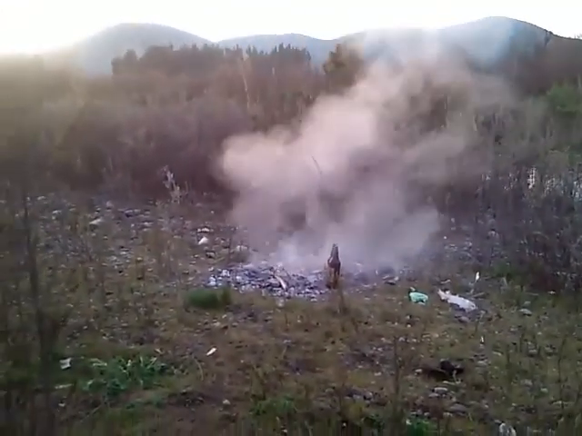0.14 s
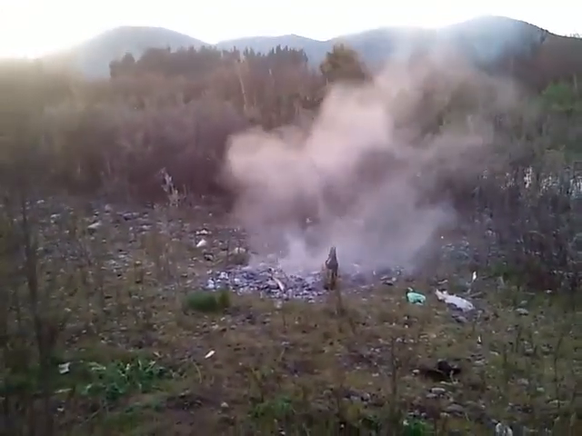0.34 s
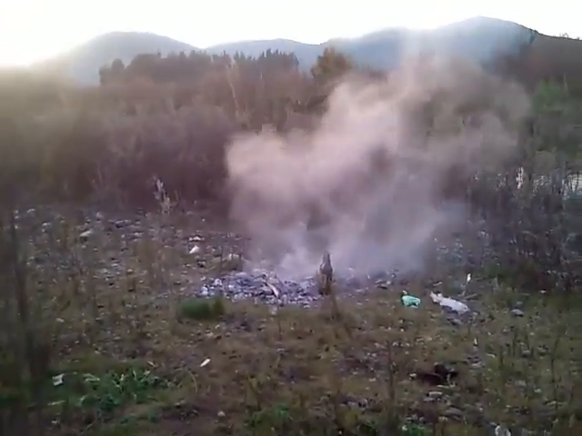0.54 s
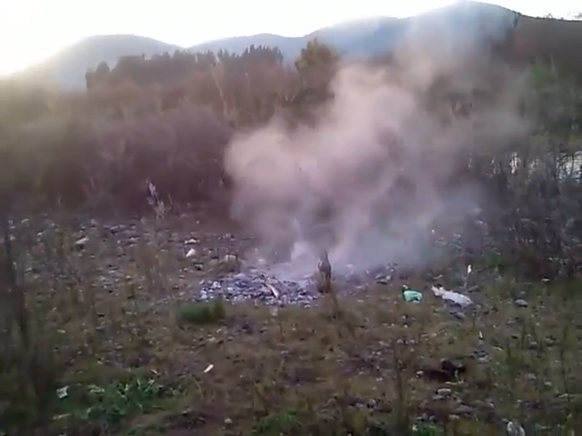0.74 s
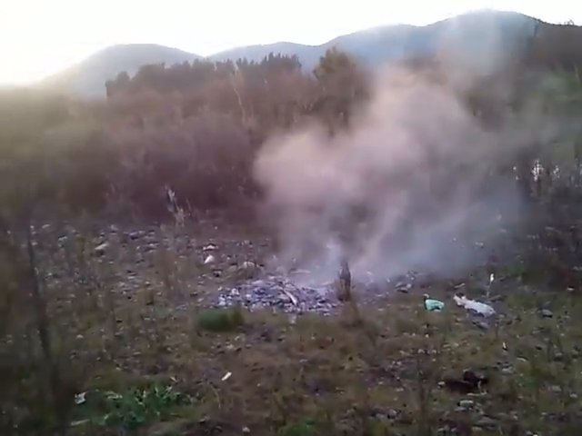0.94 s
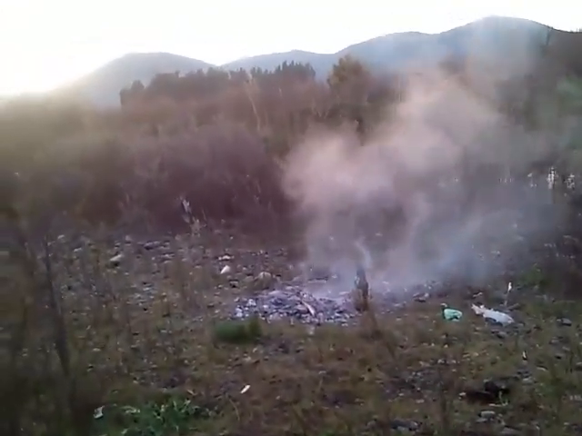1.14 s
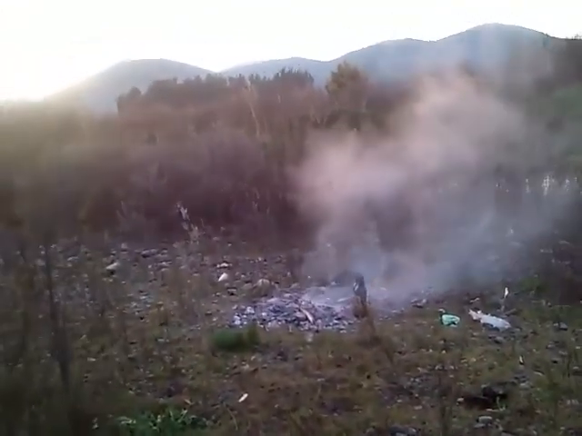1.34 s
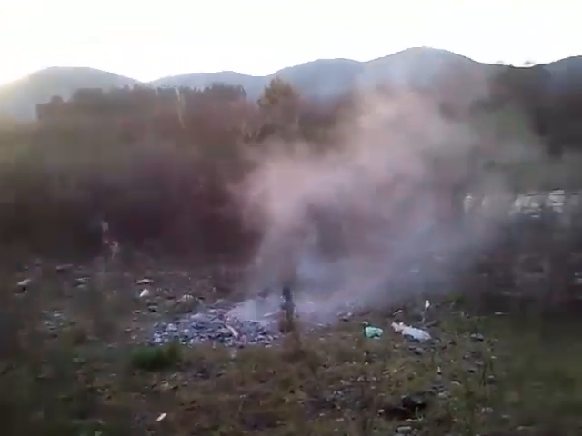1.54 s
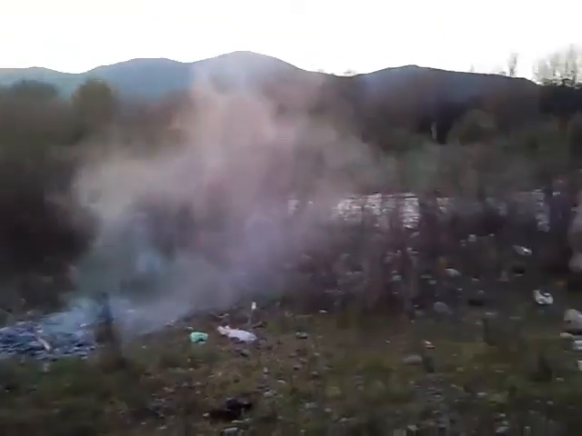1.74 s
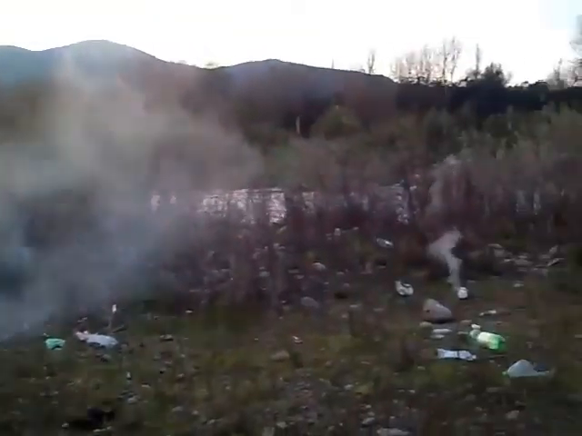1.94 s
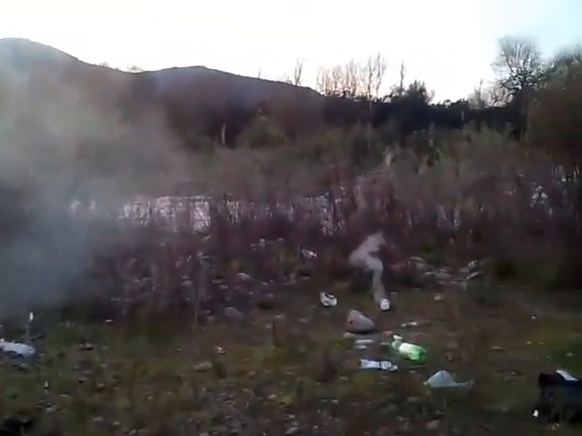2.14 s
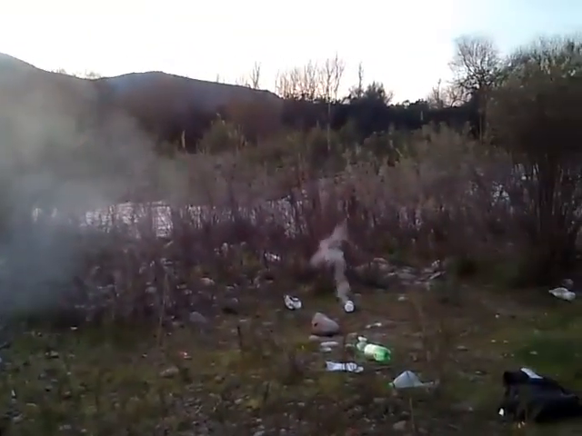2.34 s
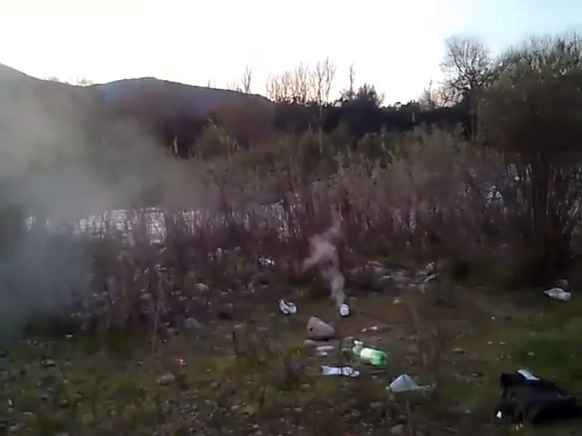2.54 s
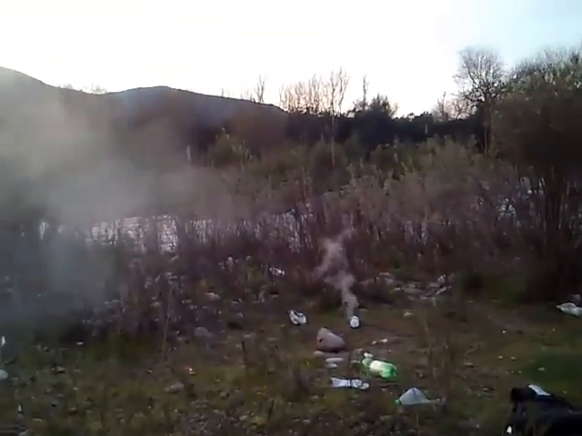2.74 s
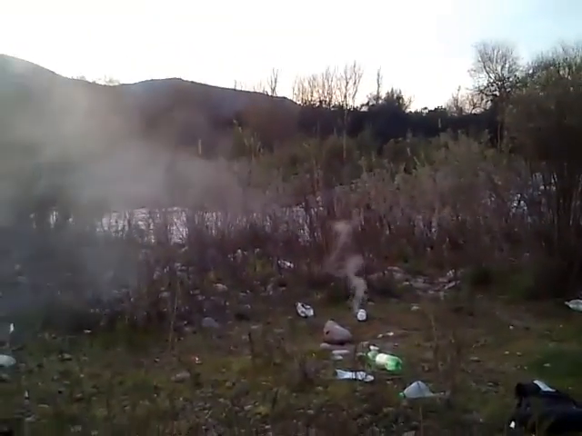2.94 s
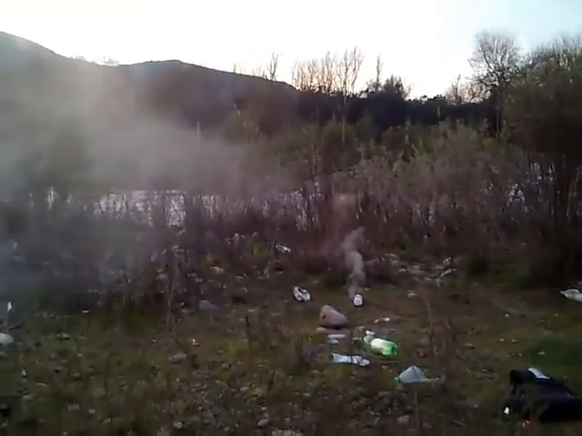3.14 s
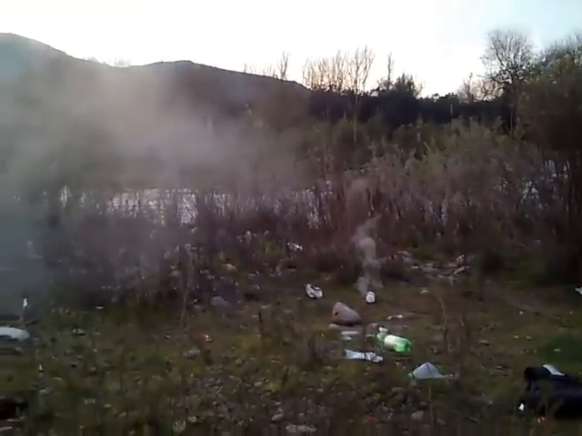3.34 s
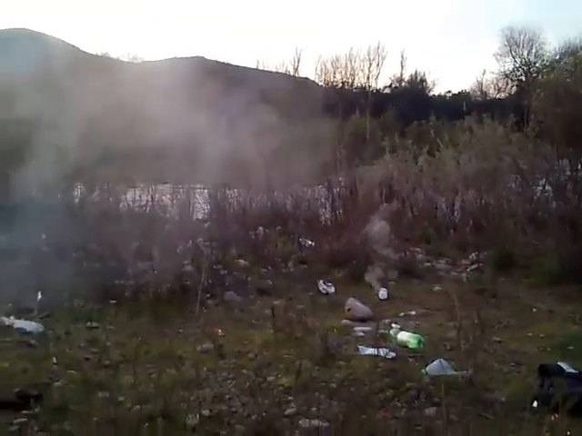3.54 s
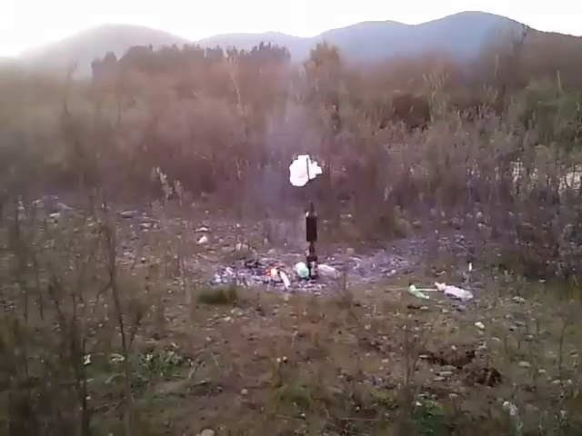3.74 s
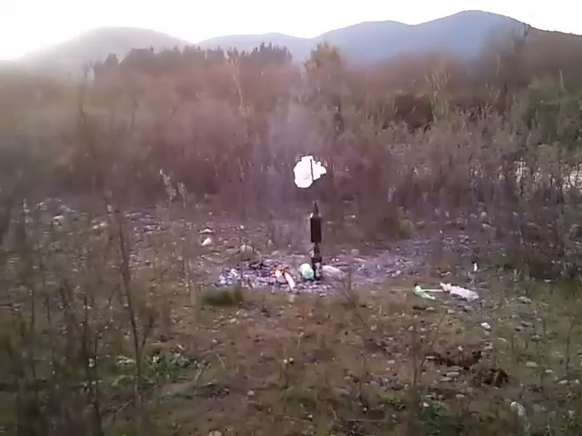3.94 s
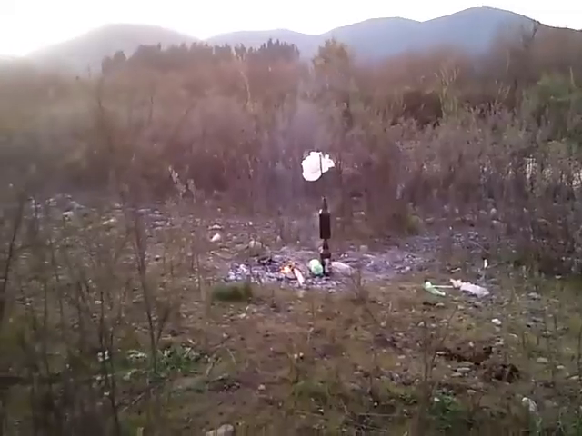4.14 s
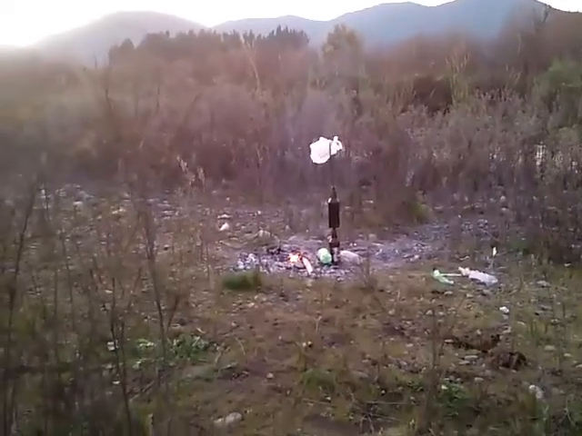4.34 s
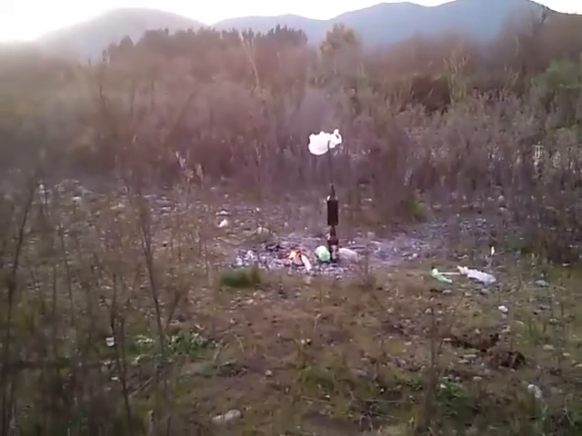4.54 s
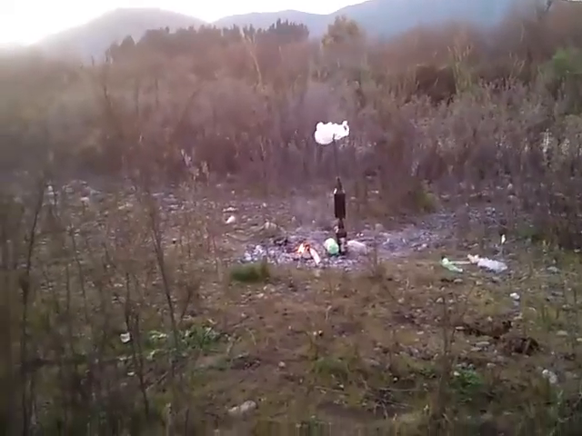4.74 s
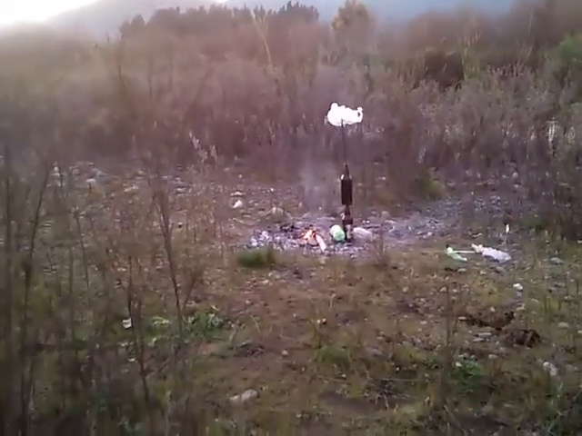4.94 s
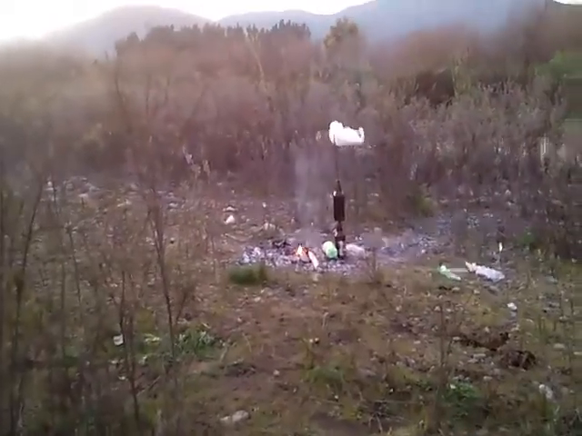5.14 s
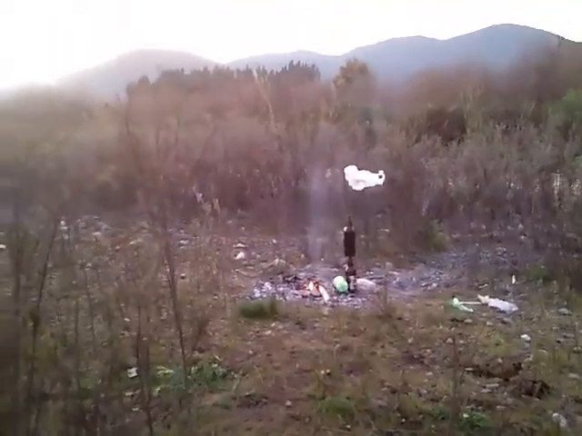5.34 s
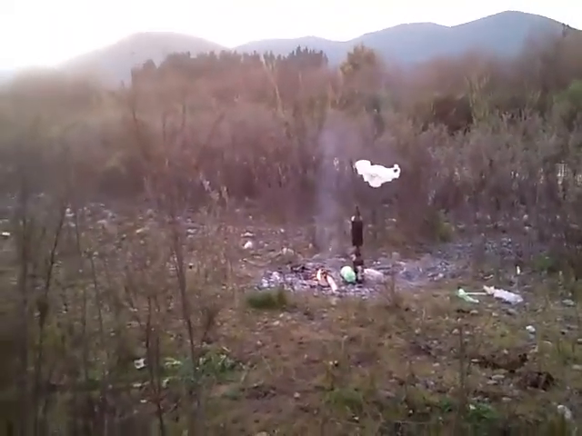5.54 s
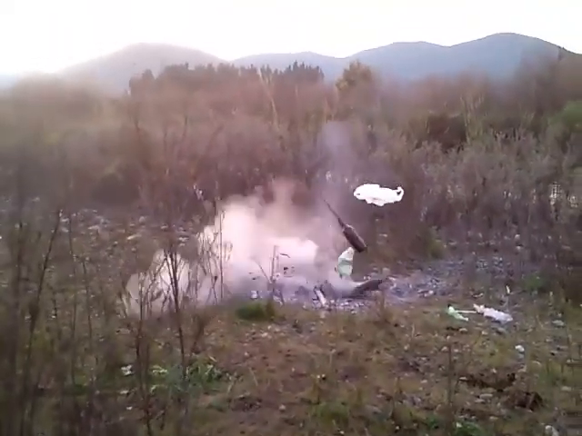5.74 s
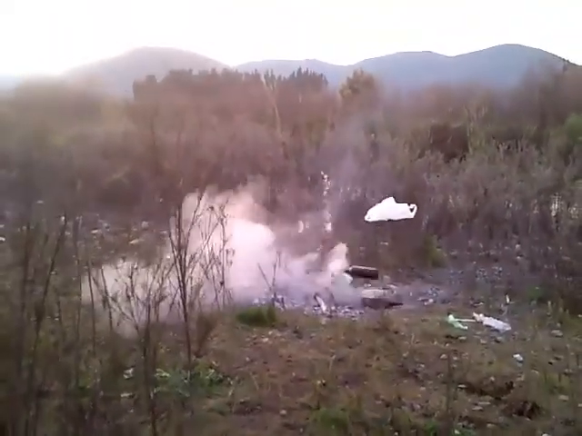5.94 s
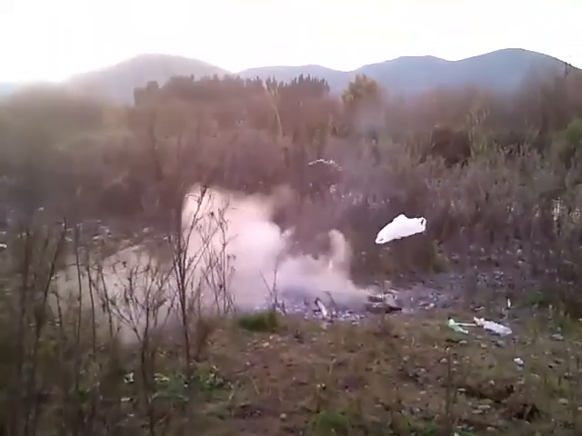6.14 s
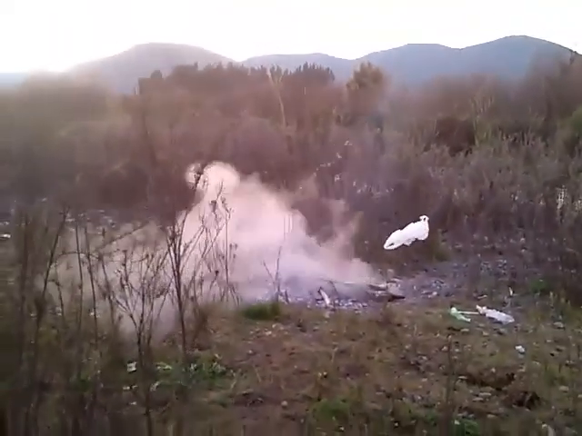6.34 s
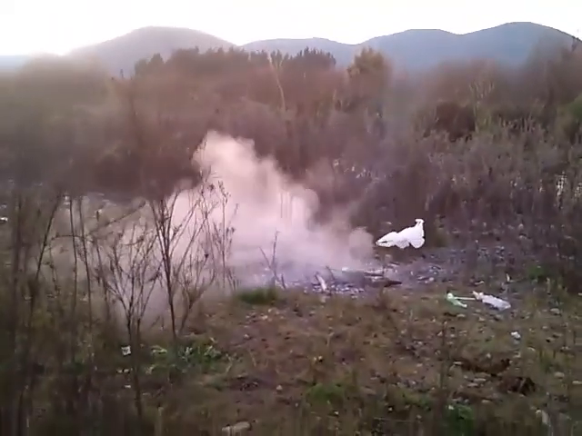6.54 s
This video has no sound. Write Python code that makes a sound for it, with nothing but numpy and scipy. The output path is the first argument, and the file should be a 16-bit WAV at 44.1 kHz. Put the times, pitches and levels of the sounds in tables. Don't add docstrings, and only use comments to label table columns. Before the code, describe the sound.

Outdoors by a river, a handheld phone picks up smooth water hiss, low gusty wind and a faint hum. Fingers knock the case early on, small twigs and embers snap, and the background changes abruptly midway. Then a gas-filled bottle bursts metres away with a violent clipped bang; the roar rolls off bushes, trees and hills, growing duller, while glass cracks down on stones and bounces.

```python
import sys
import numpy as np
from scipy import signal
from scipy.fft import rfft, irfft, next_fast_len
from scipy.io import wavfile
from scipy.ndimage import uniform_filter1d

SR = 44100
rng = np.random.default_rng(int(sys.argv[2]) if len(sys.argv) > 2 else 0)


def magnitude_from_level(level_db):
    exponent = np.asarray(level_db, float) / 20
    return 10 ** exponent


def store_pcm(level_fs):
    pcm = np.round(np.clip(level_fs, -1, 1) * 32767).astype(np.int16)
    wavfile.write(sys.argv[1], SR, np.atleast_2d(pcm).T)


N = 294588

CUT_S, BANG_S = 3.738, 5.6855
# (frequency [Hz], density [dB per Hz])
LOW_AIR = [
    [(15, -36), (25, -3), (86, 0), (124, -4), (190, -2.5), (305, -9.5), (393, -1.5), (419, -5.5), (575, -4.5), (1100, -13), (1430, -41), (2420, -120)],
    [(15, -44), (25, -3.5), (113, -7.5), (152, -16), (325, -17.5), (363, -21), (399, -14.5), (673, -19.5), (801, -19), (985, -24), (1100, -30), (1430, -52), (2420, -120)],
]


def unit_rms(x):
    return x / np.sqrt(np.mean(x ** 2))


def noise(points, lo_hz, hi_hz, grain=1., size=next_fast_len(N)):
    f = np.maximum(np.arange(size // 2 + 1) * SR / size, 1)
    hz, db = np.transpose(points)
    colour = magnitude_from_level(np.interp(np.log(f), np.log(hz), db))
    edges = (1 + (lo_hz / f) ** 8) * (1 + (f / hi_hz) ** 8)
    white = grain * rng.standard_normal(min(size, N))
    return unit_rms(irfft(rfft(white, size) * colour / np.sqrt(edges), size)[:N])


def walk(rate):
    k = int(SR / rate)
    held = np.repeat(rng.standard_normal(N // k + 1), k)
    return 1.3 * uniform_filter1d(uniform_filter1d(held, k), k)[:N]


def add(out, s, x):
    i = int(s * SR)
    out[i:i + len(x)] += x[:N - i]


def decay(t, t60):
    return np.exp(-np.log(1000) * t / t60)


def ring(hz, t60, rise_s=0.00045):
    t = np.arange(2 ** 14) / SR
    return np.sin(2 * np.pi * hz * t) * decay(t, t60) * (1 - np.exp(-t / rise_s))


def burst(hz, t60, width):
    colour = [(hz / 8, -24 / width), (hz / 1.4, 0), (hz * 1.4, 0), (hz * 8, -36 / width)]
    puff = noise(colour, 200, 15000, size=2 ** 14)
    return puff * decay(np.arange(len(puff)) / SR, t60) / 2


def river():
    # (frequency [Hz], density [dB per Hz])
    aims = [
        [(530, -31), (900, -1), (1050, -6), (1160, -5), (1440, -4.5), (2240, -8), (3250, -19.5), (3840, -12), (4710, -13), (5770, -19), (6590, -28), (8070, -23), (10600, -37), (15100, -35), (15800, -41)],
        [(530, -32), (900, -0.5), (1700, -1.5), (1890, -2.5), (2060, -2.5), (2350, -10), (2710, -17.5), (3410, -8), (4280, -11.5), (4940, -10.5), (5910, -22.5), (7420, -18), (8680, -26), (11000, -33), (15100, -37.5), (15800, -35)],
        [(530, -30), (900, -1), (1400, -3), (1700, -1), (2350, -8), (3020, -15.5), (3700, -7), (4500, -9), (5400, -13.5), (6200, -21), (7500, -21), (8800, -25.5), (10500, -33.5), (15800, -32)],
    ]
    t = np.arange(N) / SR
    smoke, water, second = (noise(colour, 970, 19000) for colour in aims)
    turn = np.interp(t, (1.3, 2.2), (0, np.pi / 2))
    hiss = np.where(t < CUT_S, np.cos(turn) * smoke + np.sin(turn) * water, second)
    return magnitude_from_level(0.17 * walk(6.1) - 43.5) * hiss


def wind():
    # (time [s], level [dB])
    gusts = [(0, -44), (.3, -47.5), (.96, -40), (1.35, -46), (2.7, -45), (3.45, -44.5), (4.1, -43.5),
             (4.45, -39), (5.15, -43), (5.5, -41), (6.68, -40.5)]
    t = np.arange(N) / SR
    wind_db = np.interp(t, *np.transpose(gusts))
    shots = [magnitude_from_level(2.2 * walk(16) + wind_db) * noise(colour, 13, 121) for colour in LOW_AIR]
    return np.where(t < CUT_S, *shots)


def hum():
    levels_db = (-43, -42.5)
    shots = [magnitude_from_level(1.0 * walk(7.4) + db) * noise(colour, 126, 1010) for colour, db in zip(LOW_AIR, levels_db)]
    return np.where(np.arange(N) / SR < CUT_S, *shots)


def knocks():
    # (time [s], peak [dB], pitch [Hz], t60 [s])
    taps = [(0.4703, -21.5, 500, 0.052), (.570, -32, 695, 0.029), (0.731, -27, 400, 0.0086),
            (0.7344, -15, 491, 0.047), (.811, -22.5, 505, 0.039), (.828, -26, 395, 0.022),
            (0.8326, -17, 501, 0.03), (.838, -16, 492, 0.03), (.856, -38, 500, .05),
            (.868, -40, 523, 0.031), (3.697, -30, 557, 0.029), (3.739, -10, 576, 0.0078)]
    # (pitch ratio [1], level [dB], t60 ratio [1])
    case = [(0.97, 4.5, 0.78), (0.432, -12.5, 1.04), (0.685, -8.5, 0.66), (1.4, -13.5, 1.3),
            (2.15, -11.5, 1.24)]
    out = np.zeros(N)
    for s, db, hz, t60 in taps:
        modes = sum(magnitude_from_level(mode_db) * ring(hz * r, t60 * k, 0.0006) for r, mode_db, k in case)
        add(out, s, -magnitude_from_level(db) * modes)
    return out


def snaps():
    # (time [s], peak [dB], centre [Hz], tail t60 [s],
    # breadth [1])
    cracks = [(1.4745, -40, 5500, .03, .5), (1.5898, -30.5, 5860, 0.065, .4), (1.6851, -32, 4640, .025, .4),
              (2.2727, -30, 3600, 0.038, 0.22), (3.5838, -30, 5470, 0.022, 0.41),
              (3.7399, -28.5, 4020, 0.031, 0.68), (4.9586, -25, 3960, 0.041, 0.75),
              (5.366, -19.5, 4140, 0.024, 0.45), (5.4996, -32.5, 5000, 0.076, 0.74),
              (6.6104, -32, 4100, .022, .4), (6.6544, -39, 2570, 0.024, 0.44)]
    out = np.zeros(N)
    for s, db, hz, t60, width in cracks:
        click = burst(hz, 0.0069, width)
        tail_db = -12.5 + 150 * t60
        add(out, s, magnitude_from_level(db) * (click + magnitude_from_level(tail_db) * burst(hz * 0.84, t60, width)))
    return out


def drone():
    hz, width_hz = 393, 3
    t = np.arange(N) / SR
    tone = noise([(20, 0), (20000, 0)], hz, hz)
    tone = signal.lfilter(*signal.iirpeak(hz, hz / width_hz, fs=SR), tone)
    return magnitude_from_level(-55) * unit_rms(tone) * np.interp(t, (2.1, 2.5), (0, 1)) * (t < CUT_S)


def shock_front():
    # (delay [ms], strength [dB over full scale], push [ms], sign [1])
    shocks = [(0, -2, .12, -1), (.2, 6, .15, 1), (.4, 14, .5, -1), (.9, 32, 2.1, 1), (4.0, 24, .75, 1),
              (9.4, 22, 1.2, 1)]
    out = np.zeros(N)
    for ms, db, push, sign in shocks:
        u = np.arange(SR // 20) / SR * 1000 / push
        add(out, BANG_S + ms / 1000, sign * magnitude_from_level(db) * (1 - u) * np.exp(-u))
    return out


def belts(t, db, loss_db, ratio, slow):
    # (arrival [s], level [dB], rise [s], hold [s], t60 [s])
    land = [
        (5.686, 0, .002, .066, .085),
        (5.718, -13.5, 0.024, .085, .4),
        (5.991, -24, 0.044, .035, .6),
        (6.32, -41, .04, .05, .8),
    ]
    power = 0
    for s, belt_db, rise, hold, t60 in land:
        swell = np.clip((t - s) / (rise * slow), 0, 1)
        fade_db = 60 * np.maximum(t - s - rise - hold, 0) / (t60 * ratio)
        power = power + (swell * magnitude_from_level(db + belt_db - loss_db * (s - BANG_S) - fade_db)) ** 2
    return np.sqrt(power)


def land_roar():
    edges_hz = (60, 220, 560, 2800, 15500)
    # (frequency [Hz], density [dB per Hz])
    near_colour = [(40, -17), (130, -3), (260, 0), (400, 1), (520, -1), (650, -10), (850, -15), (1300, -13),
                   (2100, -16.5), (2900, -25), (3800, -21.5), (6300, -30), (9000, -43), (15500, -53)]
    # (frequency [Hz], density [dB per Hz])
    far_colour = [(40, -20), (130, -0.5), (200, 0), (330, -2), (430, -3.5), (560, -18), (850, -17),
                  (1300, -15.5), (2100, -20.5), (2900, -26.5), (3800, -23), (6300, -35), (9000, -47.5),
                  (15500, -58)]
    # (level [dB], loss [dB per s of path], t60 ratio [1], overload share [1], rise ratio [1])
    bands = [
        (-9.5, -22, 2.2, .5, 1.0),
        (-1.5, -2, 1.5, 1.05, 1.0),
        (-2.5, 21, .9, 1.3, 1.75),
        (-9.5, 20, 1.05, .5, 1.2),
    ]
    lumps_db = (1, 1.8, 2.5, 1.8)
    out, t = np.zeros(N), np.arange(N) / SR
    after = t - BANG_S - .013
    strong_db = 16.5 * np.exp(-(after / .022) ** 2)
    onset = np.clip(after / .004 + 1, 0, 1) ** 2
    lumps = walk(300)
    away = np.interp(t, (5.84, 6.02), (0, np.pi / 2))
    for lo, hi, band, lump_db in zip(edges_hz, edges_hz[1:], bands, lumps_db):
        db, loss_db, ratio, share, slow = band
        near = noise(near_colour, lo, hi, magnitude_from_level(lump_db * lumps))
        far = noise(far_colour, lo, hi, magnitude_from_level(lump_db * lumps))
        envelope = onset * magnitude_from_level(share * strong_db) * belts(t, db, loss_db, ratio, slow)
        out += envelope * (np.cos(away) * near + np.sin(away) * far)
    return out


def echoes():
    # (time [s], peak [dB], centre [Hz], length [cycles])
    returns = [(5.782, 0, 1710, 2.8), (5.833, -3, 300, 1.2), (5.857, -8, 1510, 2.2), (5.903, -19, 170, 2.2),
               (5.914, -22, 1500, 3.5), (5.93, -17, 240, 3.5), (5.955, -17, 330, 3.5),
               (5.988, -14, 189, 1.4), (6.036, -16, 200, 3.1), (6.0627, -28, 1200, 3),
               (6.212, -19, 190, 2.5), (6.244, -21, 200, 1.4), (6.357, -26, 200, 1.9),
               (6.566, -30, 485, 4.2)]
    out = np.zeros(N)
    for s, db, hz, cycles in returns:
        u = np.arange(int(cycles * SR / hz)) / SR
        window = np.sin(np.pi * u * hz / cycles)
        add(out, s - .5 / hz, -magnitude_from_level(db) * np.sin(2 * np.pi * hz * u) * window)
    return out


def bottle():
    # (time [s], blow [dB], ring [dB], hardness [1], neck [dB])
    falls = [
        (6.0914, 7, 1, 1.95, -6),
        (6.1262, -6, -24, 0.62, -3),
        (6.1607, -23.5, -32, .7, 5),
    ]
    # (frequency [Hz], level [dB], t60 [s])
    glass_modes = [(3690, -6, 0.061), (3820, -26, 0.14), (4640, -29, .07), (4700, -24.5, 0.21),
                   (5650, -34, .15), (6140, -20.5, 0.21), (6180, -28, 0.17), (6450, -10.5, 0.033),
                   (7850, -22, 0.028), (8400, -41, .15), (9130, -23, 0.023), (10000, -40, .15),
                   (9900, -40, 0.21), (12700, -28, .012), (13900, -46, .15), (13980, -46, .2)]
    # (frequency [Hz], level [dB], t60 [s])
    stone_modes = [(1430, -3, 0.033), (1760, 4.5, 0.02), (2050, 7, 0.014), (2330, -12, 0.023),
                   (3250, 3, 0.014)]
    out = np.zeros(N)
    glass = sum(magnitude_from_level(db) * ring(hz, t60) for hz, db, t60 in glass_modes)
    for s, blow_db, ring_db, hard, neck_db in falls:
        clack_share = min(hard / 1.3, 1)
        clack = magnitude_from_level(neck_db) * ring(4500, 0.028)
        for hz, db, t60 in stone_modes:
            struck_hz = hz * (1 + 0.038 * rng.standard_normal())
            clack += magnitude_from_level(db) * ring(struck_hz, t60 * clack_share)
        crack = magnitude_from_level(-8.5) * burst(2300, 0.011, hard)
        rattle = magnitude_from_level(-14.5) * burst(1620, 0.033 + 0.014 * hard, hard)
        add(out, s, magnitude_from_level(blow_db) * (magnitude_from_level(-9.5) * clack + crack + rattle) + magnitude_from_level(ring_db) * glass)
    add(out, falls[0][0], magnitude_from_level(-26) * burst(2500, 0.31, 1.8))
    return out


def scene():
    before = river() + wind() + hum() + knocks() + snaps() + drone()
    bang = shock_front() + land_roar() + echoes()
    return (before + bang + bottle())[None]


def band_limit(x):
    return signal.sosfilt(signal.butter(12, 16760, fs=SR, output="sos"), x)


def record(dry):
    flat = np.clip(dry, -.97, .97)
    top = signal.ellip(8, .1, 30, 15700, fs=SR, output="sos")
    return band_limit(signal.sosfilt(top, flat))


dry = scene()
out = record(dry)
store_pcm(out)
```